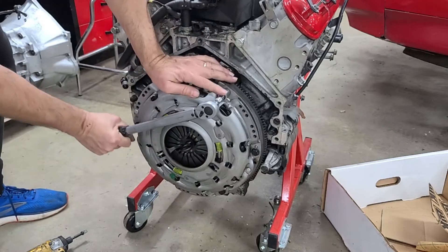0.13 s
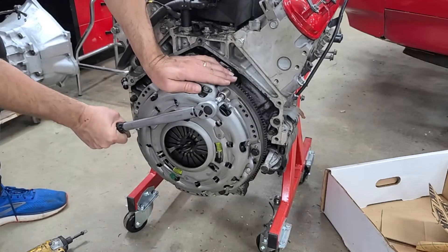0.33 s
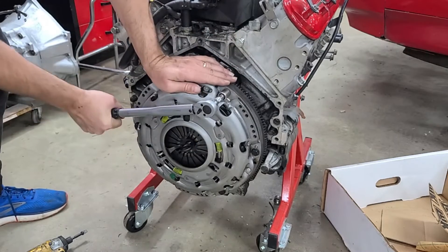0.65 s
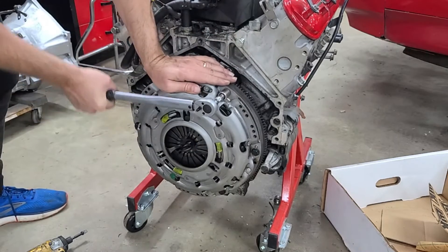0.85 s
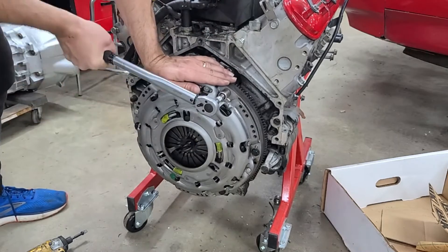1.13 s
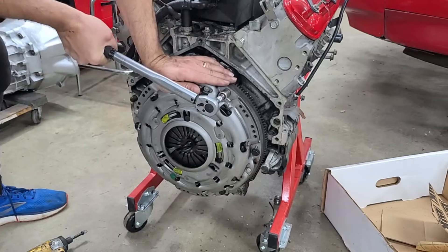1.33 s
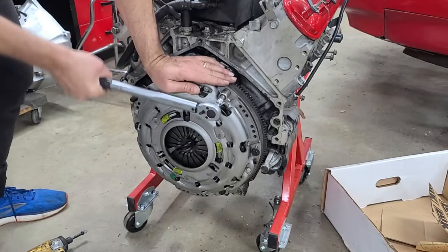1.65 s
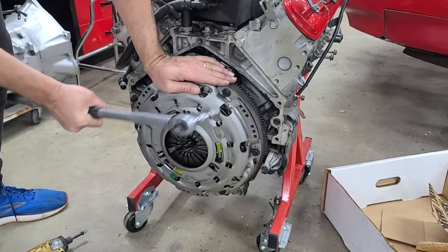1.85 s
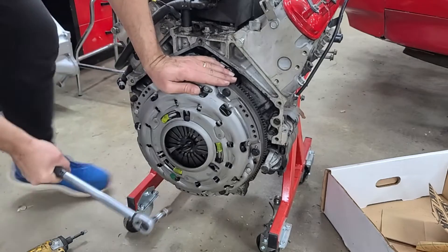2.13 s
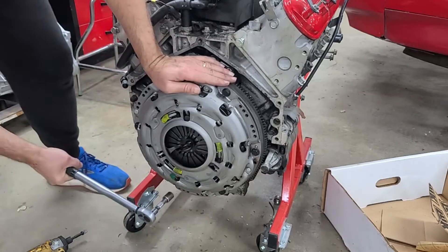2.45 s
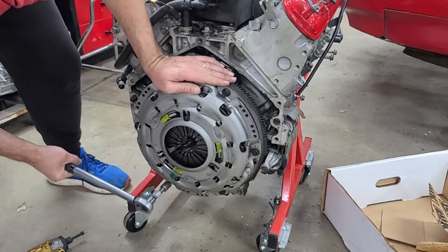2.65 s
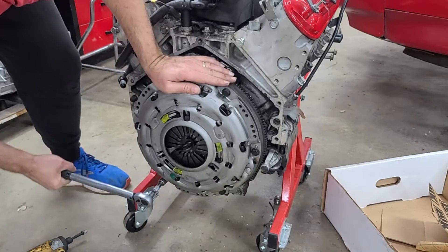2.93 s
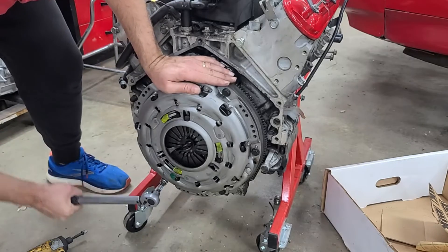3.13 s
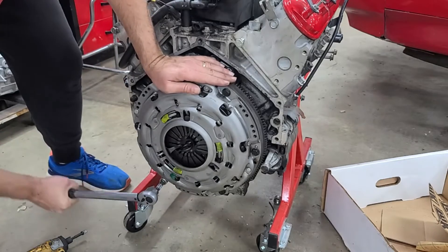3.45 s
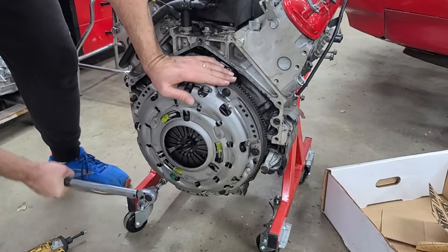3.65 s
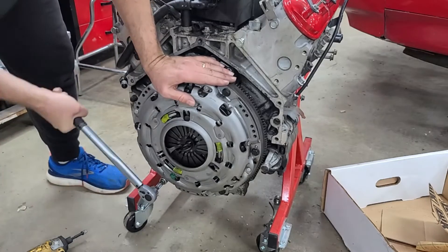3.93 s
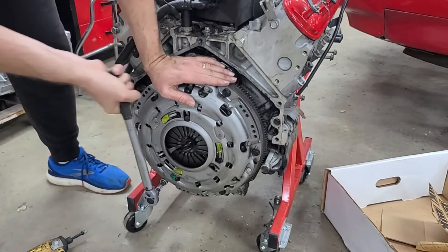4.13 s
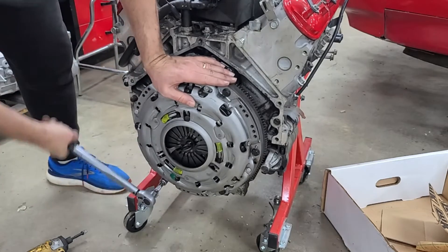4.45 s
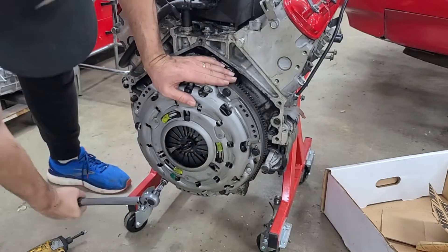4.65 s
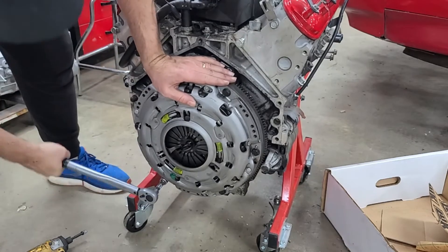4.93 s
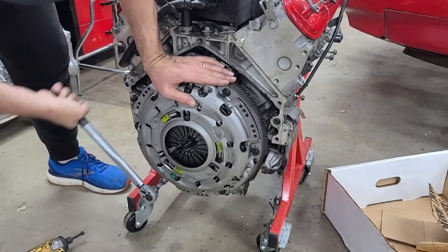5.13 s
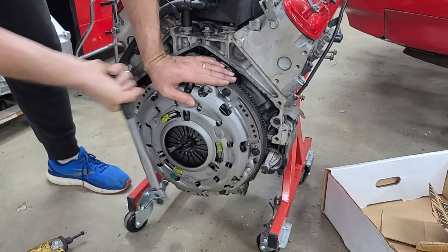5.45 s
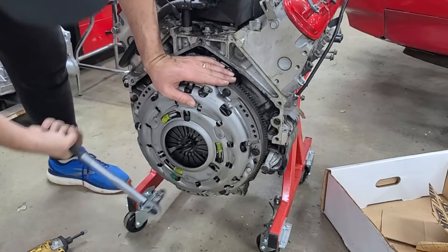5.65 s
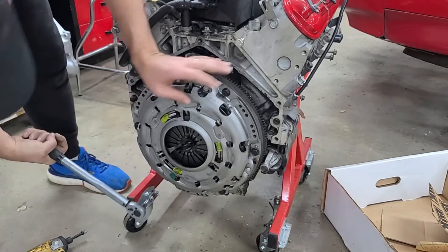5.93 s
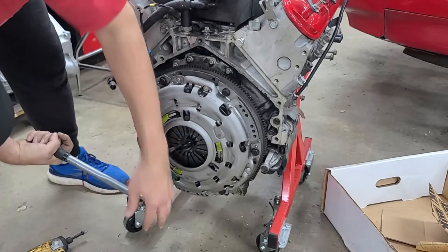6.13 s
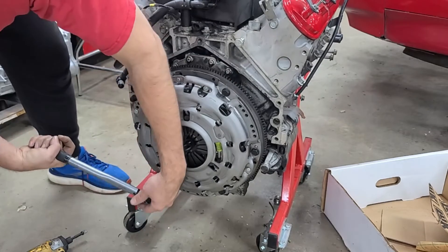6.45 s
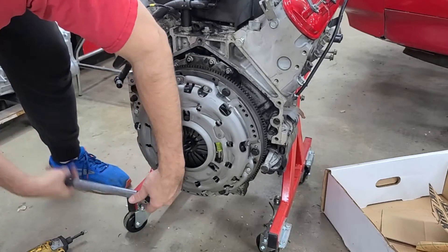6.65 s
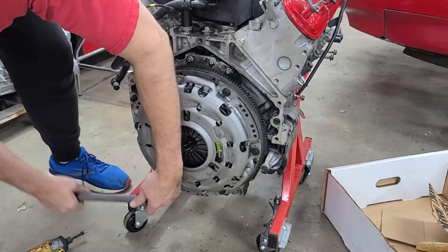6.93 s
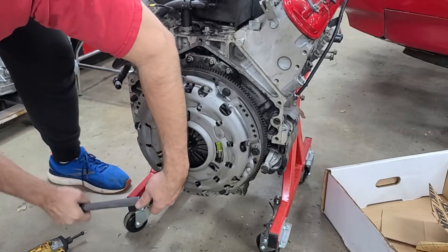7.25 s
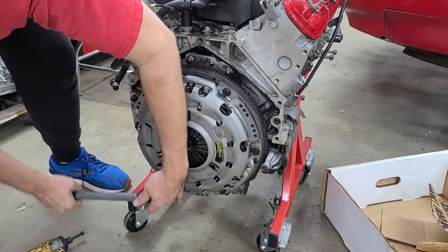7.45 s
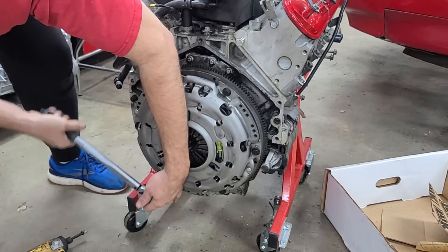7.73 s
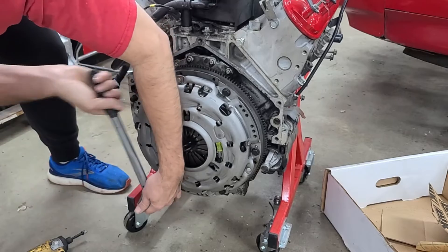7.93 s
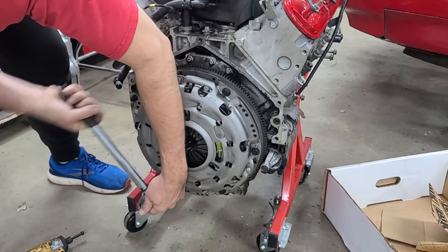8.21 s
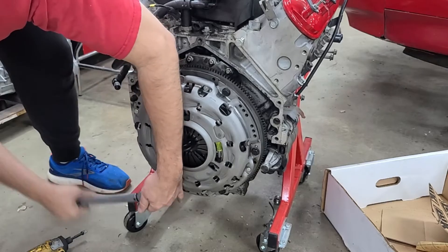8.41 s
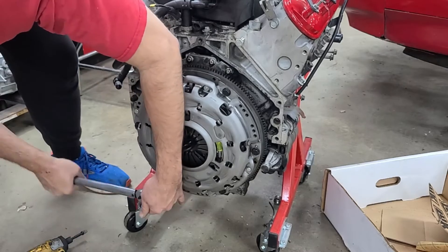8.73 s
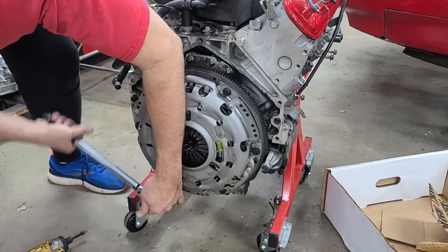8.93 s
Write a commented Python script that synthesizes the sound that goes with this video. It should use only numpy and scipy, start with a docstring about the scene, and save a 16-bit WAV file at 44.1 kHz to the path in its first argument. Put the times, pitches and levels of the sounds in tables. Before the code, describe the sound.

A torque wrench clicks over loudly on an engine bolt, and the socket comes off with clunks and short scrapes. Loose steel then knocks and clinks on a metal caster in scattered clusters, loudest past the middle, alternating with three brief bursts of bright ratchet ticks. Soft handling rustle fills some gaps. Everything is heard nearby, a little to the left, over a faint steady hum in a mildly reverberant garage.

```python
"""A garage. A mechanic torques a clutch bolt on an engine: the wrench's toggle snaps over and rattles,
then the socket clunks and scrapes off the bolt. At a caster of the steel engine stand the socket knocks
and the ratchet pawl ticks on the back strokes. Each blow is a noise crack plus ringing steel modes;
the heaviest also jolt the engine. Hands rub on the tool; a motor hums faintly over the room air."""
import sys
import numpy as np
from scipy import signal
from scipy.fft import rfft, irfft
from scipy.io import wavfile

SR = 44100
rng = np.random.default_rng(int(sys.argv[2]) if len(sys.argv) > 2 else 0)


def pcm_store(signal):
    """Save signal as 16-bit PCM."""
    levels = np.round(np.clip(np.atleast_2d(signal), -1, 1) * 32767)
    wavfile.write(sys.argv[1], SR, levels.astype(np.int16).T)


N = 400428

# Motor partials. Each row: frequency in Hz, amplitude in dB, waver in dB.
MOTOR_PARTIALS = [(119.1, -53, 2), (188.2, -54.5, 2), (357.6, -66.5, 3), (673, -69, 1.5)]
# Room air. Each row: frequency in Hz, relative density in dB.
AIR_SPECTRUM = [(22, -16.5), (62, -3.5), (80, 1.5), (103, -8.5), (160, -0.5), (250, -6.5), (330, -7),
                (500, -9.5), (680, -13), (1000, -17), (2800, -21), (4200, -33.5), (6500, -36),
                (9000, -48.5), (16000, -44)]
# Diffuse room sound. Each row: frequency in Hz, left-right correlation.
ROOM_CORRELATION = [(60, 0.98), (150, .92), (300, 0.77), (700, 0.078), (2000, 0.11), (10000, 0.059)]
# Grip shifts and tool swings. Each row: middle in seconds, length in seconds, level in dB.
GRIPS = [(0.506, 0.35, -68), (1.666, 0.15, -43.5), (2.29, 0.32, -52.5), (3.197, 0.25, -65.5),
         (3.878, 0.055, -53.5), (4.09, 0.16, -58), (5.198, 0.11, -65.5), (6.008, 0.097, -51.5),
         (6.989, 0.33, -64), (7.819, 0.18, -75)]

# Blows: socket on caster, toggle in wrench, socket on clutch bolt. Each row: start in seconds,
# mid-band level in dB, bass thud and treble edge in dB re mid, ring in dB re crack, clink in Hz.
CASTER_KNOCKS = [(0.1113, -53, 8, -20, -10.5, 3910), (2.7009, -41.5, -7, -46, -8.5, 3830),
                 (2.7507, -21, -7.5, -13, -15.5, 2960), (2.8858, -38, -3, 2.5, -14, 5000),
                 (2.8885, -23, -7.5, 0.5, -13.5, 7600), (3.0625, -37.5, -4, -12, -9, 6700),
                 (3.2468, -56.5, 12, -34, -13, 1940), (3.3286, -38, 1, -12.5, -9.5, 3170),
                 (3.4073, -44, -9, -20, -23, 4730), (3.884, -57, -14, 1, -16, 5500),
                 (4.238, -58, 9, -28, -3, 2600), (4.7013, -49.5, 9, -18, -2, 3550),
                 (5.437, -47.5, -10.5, -17.5, 1, 4110), (5.4549, -21.5, -22, -17.5, 6, 3900),
                 (5.4749, -29, -17, -16.5, -14, 4050), (5.507, -32.5, -3, -21.5, -8, 4160),
                 (5.5407, -16, -5, -23.5, -4.5, 5850), (5.589, -36, 5.5, -7, -5, 3000),
                 (5.6052, -20.5, -3, -5.5, -6, 5470), (5.6085, -22, -0.5, -0.5, -8.5, 5270),
                 (6.2107, -28, 0.5, -18.5, -5.5, 2830), (6.235, -22, -27, -18, -9, 4100),
                 (6.3032, -25.5, -8.5, -9.5, -12, 3340), (6.314, -35, -21, -6, -2, 3540),
                 (6.4093, -31, -11, -6, 0, 6700), (6.4323, -25, 1.5, -4.5, -6.5, 3180),
                 (6.444, -37, 7.5, -4, -7, 2570), (6.924, -55, 10, -14, -4, 3270),
                 (7.0495, -54, 0.5, -16, -10.5, 3000), (7.2388, -50.5, -1, -24, -10, 2900),
                 (7.266, -49, -0.5, -31, -14, 2930), (7.409, -52.5, 3.5, -45, -11, 3430),
                 (8.1302, -38, 4.5, -13.5, -11, 3880), (8.7054, -49, 3.5, -21, -16, 2950),
                 (9.0424, -48.5, -9.5, -29.5, -13.5, 3340)]
WRENCH_SNAPS = [(0.6462, -31, -14.5, -7, -10.5, 4400), (0.6507, -20, -18, -12, -12.5, 3000),
                (0.6527, -17.5, -22.5, -11, -13.5, 6600), (0.6765, -36.5, -8.5, -12.5, -5.5, 3003),
                (0.6825, -36.5, -13.5, -17, -10.5, 2900)]
BOLT_CLUNKS = [(1.5648, -17.5, -14, -8, -14, 4220), (1.7524, -29, -17, -18, -23, 4600),
               (1.864, -28.5, -13.5, -16, -25, 3020)]
# Knock position, nearer the middle as the socket slips off the caster.
# Each row: time in seconds, left over right in dB.
KNOCK_PAN = [(5.5, 4.5), (5.54, 2), (5.61, 3.5), (6.2, 5)]
# Uneven shading by the engine: left over right in dB for bass, mid and treble.
ENGINE_SHADING_DB = [-5, -1, -6]
# Jolts of the engine. Each row: start in seconds, level in dB.
JOLTS = [(0.654, -42.5), (1.567, -45.5), (1.862, -47), (5.543, -53), (5.608, -34)]
# Pulls on the socket. Each row: start in seconds, length in seconds, level swelled to in dB.
PULLS = [(1.703, 0.021, -39), (1.827, 0.029, -24.5), (1.913, 0.058, -53), (1.97, 0.11, -44),
         (2.17, 0.031, -30.5), (2.264, 0.024, -48), (2.404, 0.019, -46.5)]
# Teeth passing the pawl. Each row: time in seconds, mid-band level in dB,
# bass thud and treble edge in dB re mid, clink in Hz.
TEETH = [(4.3664, -36, -8.5, 0.5, 6380), (4.4403, -34.5, -7.5, 4.5, 3070), (4.4935, -30.5, -17, -1.5, 2840),
         (4.5399, -35, -7.5, 2.5, 6200), (4.5922, -38.5, -5, 5, 6600), (6.6629, -38, -7.5, 2.5, 5560),
         (6.7192, -35, -11, 0.5, 3140), (6.778, -34, -15.5, 0, 4900), (8.258, -34.5, -15, 3, 4300),
         (8.302, -33, -8, 2.5, 3120), (8.3413, -35, -11, 1.5, 5560), (8.3772, -33, -9, -5.5, 3320),
         (8.416, -32.5, -13.5, -4.5, 6560), (8.4665, -36, -12, 3.5, 2780)]

# Modes of the steel parts. Each row: frequency in Hz, relative level in dB.
STAND_MODES = [(1208, 0), (1248, 5.5), (1282, -4.5), (1421, -3.5), (1540, -6), (1695, -4), (2046, -7),
               (2190, -9), (2610, -2.5), (2765, 1), (2920, -4.5), (3045, 1.5), (3182, -1.5), (3370, -2),
               (3578, -5), (4128, 5), (4228, -0.5), (4610, -6), (5251, -1), (6490, 6)]
WRENCH_MODES = [(1240, -3), (1421, -5), (1561, -15), (2240, -8), (2358, -4), (2885, 2.5), (3035, 4.5),
                (3391, 2.5), (5152, -6.5), (5992, -2.5), (6300, -2.5), (6573, -3)]
CLUTCH_MODES = [(1275, -3.5), (1560, -17.5), (2546, -9), (2993, 10), (3340, -2.5), (4296, -4.5), (4592, -5),
                (7397, 5.5)]
SOCKET_MODES = [(565, 7), (940, -4.5), (1700, -6), (3150, 0), (4800, -1), (6800, -2.5)]
PAWL_MODES = [(1200, 5.5), (1255, 6), (2720, -6), (3050, -13), (3410, -21), (4130, 6), (6450, 0.5),
              (6740, 2)]

# Spectra of rubs, cracks, thumps and reverb. Each row: frequency in Hz, relative density in dB.
RUSTLE_SPECTRUM = [(300, -4), (1250, 2.5), (2100, 3.5), (3000, 7.5), (4200, 1.5), (6500, -2), (9000, -16),
                   (15000, -7.5)]
KNOCK_SPECTRUM = [(120, -17.5), (400, -21), (700, -7.5), (1020, -11.5), (1250, 2.5), (1480, -9), (1900, -5),
                  (2900, 6), (4300, 4.5), (6600, -1), (8300, -11.5), (11000, -5.5), (16000, -15)]
SNAP_SPECTRUM = [(120, -37.5), (450, -11), (800, -9.5), (1250, -4.5), (1800, -16), (3100, -2), (4500, -4),
                 (5500, -7.5), (7300, -1.5), (8800, -9.5), (11500, 5), (16000, -2.5)]
JOLT_SPECTRUM = [(80, -32.5), (170, 10), (250, -10.5), (340, -1.5), (460, -4), (700, -18.5), (3000, -49)]
SCRAPE_SPECTRUM = [(150, -1.5), (400, -4.5), (750, -5), (2000, 4), (3000, 3), (5000, 2), (7300, -0.5),
                   (9000, -8), (16000, -5.5)]
TOOTH_SPECTRUM = [(120, -34), (500, -14), (950, -7.5), (1230, -5), (1600, -7), (2200, -7.5), (3000, 4.5),
                  (4000, 1), (6500, -2.5), (8500, -11), (12000, -10), (16000, -14)]
GARAGE_SPECTRUM = [(150, -1), (1200, 4), (3000, 5), (7000, -1), (10000, 0), (16000, 0)]
# Reverb decay. Each row: frequency in Hz, T60 in seconds.
GARAGE_T60 = [(200, 0.12), (1200, 0.59), (3000, 0.42), (6500, 0.39), (10000, 0.25), (16000, 0.28)]

RING_TIME_S = np.arange(SR // 2) / SR
LEFT_RIGHT = np.array([[1], [-1]])
EDGES_HZ = np.geomspace(22, 18000, 30)
BANDS = [(np.sqrt(lo * hi), signal.butter(2, [lo, hi], "band", fs=SR, output="sos"))
         for lo, hi in zip(EDGES_HZ, EDGES_HZ[1:])]
REGISTERS = [signal.butter(4, band_hz, "band", fs=SR, output="sos")
             for band_hz in [(130, 1900), (1900, 7500), (7500, 17000)]]


def from_db(db):
    """Decibels to gain."""
    return 10 ** (np.asarray(db) / 20)


def unit_rms(x):
    """Scale to unit power."""
    return x / np.sqrt(np.mean(x ** 2) + 1e-20)


def at_hz(table, hz):
    """Read a table on a log-frequency axis."""
    freqs_hz, values = np.transpose(table)
    return np.interp(np.log(hz), np.log(freqs_hz), values)


def resonate(x, hz, q):
    """One resonance, unity gain at its peak."""
    return signal.lfilter(*signal.iirpeak(hz, q, fs=SR), x)


def drift(rate_hz):
    """Slow random wander of unit RMS."""
    hop, warmup = 100, 1000
    pole = np.exp(-2 * np.pi * rate_hz * hop / SR)
    noise = rng.standard_normal(N // hop + warmup + 2)
    slow = signal.lfilter([1], [1, -2 * pole, pole * pole], noise)[warmup:]
    return np.interp(np.arange(N) / hop, np.arange(len(slow)), unit_rms(slow))


def coloured(x, spectrum, size=4096):
    """Shape x with a minimum-phase filter."""
    bins_hz = np.arange(size // 2 + 1) * SR / size + 1
    cepstrum = irfft(np.log(from_db(at_hz(spectrum, bins_hz))))
    cepstrum[1:size // 2] *= 2
    cepstrum[size // 2 + 1:] = 0
    impulse = irfft(np.exp(rfft(cepstrum)))
    return signal.fftconvolve(x, impulse[None], axes=-1)[:, :x.shape[-1]]


def stereo(pair, correlation):
    """Mix two independent signals to left and right as mid and side."""
    return np.sqrt((1 + correlation) / 2) * pair[0] + np.sqrt((1 - correlation) / 2) * pair[1] * LEFT_RIGHT


def diffuse_bands(samples):
    """Yield centre frequency and stereo noise for each band of the room."""
    white = rng.standard_normal((2, 2, samples))
    for k, (hz, sos) in enumerate(BANDS):
        yield hz, signal.sosfilt(sos, stereo(white[k % 2], at_hz(ROOM_CORRELATION, hz)))


def friction(grains_per_s, spread_db):
    """Surfaces catch and slip in a dense rain of tiny contacts."""
    sizes = rng.standard_normal((2, N)) * from_db(spread_db * np.minimum(rng.exponential(1, (2, N)), 4))
    caught = rng.random((2, N)) < grains_per_s / SR
    return stereo(sizes * caught, correlation=0.12)


def contact_force(chatter_s, bounce_db, bounces=9):
    """One firm contact, then fading bounces as loose parts settle."""
    force = np.zeros(SR // 10)
    lateness = rng.exponential(1, bounces)
    onsets = np.minimum(lateness * chatter_s * SR, len(force) - 1).astype(int)
    force[onsets] = rng.normal(0, 1, bounces) * from_db(bounce_db) * np.exp(-lateness / 2)
    force[0] = 1
    return force


def steel_crack(spectrum, t60_s, strike_db, strike_s):
    """A hard strike, then crowded, quickly damped modes as a noise burst."""
    t = RING_TIME_S
    mid, side = rng.standard_normal((2, len(t)))
    highpass = signal.butter(1, 1100, "high", fs=SR, output="sos")
    side = signal.sosfilt(highpass, side)   # long waves reach both sides alike
    decay = from_db(-60 * t / t60_s) * (1 - np.exp(-t / 0.0007))
    strike = from_db(strike_db) * np.exp(-t / strike_s)
    return unit_rms(coloured(stereo([mid, side], correlation=0.04) * (decay + strike), spectrum))


def steel_ring(modes, detune, t60_1khz_s):
    """Long modes; loose joints split each into four beating partials."""
    t = RING_TIME_S
    hz, level_db = np.repeat(np.transpose(modes), 4, axis=1)
    hz = hz * (1 + detune * np.sqrt(hz / 2200) * rng.standard_normal(len(hz)))
    t60_s = t60_1khz_s * (hz / 1000) ** -0.45
    gains = from_db(level_db + 2 * rng.standard_normal(len(hz)))
    phasors = gains * np.exp(2j * np.pi * rng.random(len(hz)))
    poles = (2j * np.pi * hz - np.log(1000) / t60_s) / SR
    block = 150   # damped sines summed blockwise for speed
    block_starts = phasors * np.exp(np.outer(np.arange(0, len(t), block), poles))
    ring = (block_starts @ np.exp(np.outer(poles, np.arange(block)))).real.ravel()[:len(t)]
    return unit_rms(ring * (1 - np.exp(-t / 0.003)))   # takes a few ms to spread through the metal


def blows(table, crack, ring, chatter_s, bounce_db, clink_db, clink_q, pan):
    """Steel on steel; spot and hardness of each contact set its clink, thud, edge and ring."""
    out = np.zeros((2, N + SR))
    window_s = 0.02   # level = energy gathered into this time
    for start_s, level_db, thud_db, edge_db, ring_db, clink_hz in table:
        response = steel_crack(**crack) + from_db(ring_db) * steel_ring(**ring)
        hit = signal.fftconvolve(response, contact_force(chatter_s, bounce_db)[None], axes=-1)
        hit += from_db(clink_db) * resonate(hit, clink_hz, clink_q)
        start = round(start_s * SR)
        pan_db = np.interp(start_s, *np.transpose(pan))
        for sos, register_db, shade_db in zip(REGISTERS, (thud_db, 0, edge_db), ENGINE_SHADING_DB):
            part = signal.sosfilt(sos, hit)
            part /= np.sqrt(np.sum(part ** 2, axis=1, keepdims=True) / (window_s * SR))
            gain = from_db(level_db + register_db + (pan_db + shade_db) * LEFT_RIGHT / 2)
            out[:, start:start + part.shape[1]] += gain * part
    return out[:, :N]


def motor_hum():
    """A motor's partials, wavering in level and phase."""
    t = np.arange(N) / SR
    return sum(from_db(db + waver_db * drift(5.5)) * np.sin(2 * np.pi * hz * t + waver_db / 2 * drift(3.4))
               for hz, db, waver_db in MOTOR_PARTIALS)


def room_air():
    """Soft, steady rush of air."""
    air = sum(noise * from_db(at_hz(AIR_SPECTRUM, hz)) for hz, noise in diffuse_bands(N))
    return from_db(-54.5) * unit_rms(air)


def handling(holding_db=-68.5):
    """Skin and cloth rub on the tool; its head drags on the caster and wakes the stand's modes."""
    t = np.arange(N) / SR
    rub = unit_rms(coloured(friction(grains_per_s=8000, spread_db=-1), RUSTLE_SPECTRUM))
    catches = friction(grains_per_s=270, spread_db=2.5)
    drag = unit_rms(sum(from_db(db) * (1000 / hz) * resonate(catches, hz, q=35) for hz, db in STAND_MODES))
    rub *= from_db(-1 + 2.5 * drift(9))
    drag *= from_db(-7.5 + 3.2 * drift(14))
    grips = sum(from_db(db) * np.exp(-2 * ((t - middle_s) / length_s) ** 2)
                for middle_s, length_s, db in GRIPS)
    return (rub + drag) * (from_db(holding_db) + grips)


def socket_knocks():
    """The loose socket knocks on the caster and rings the stand's tubes."""
    crack = dict(spectrum=KNOCK_SPECTRUM, t60_s=0.046, strike_db=1.5, strike_s=0.0006)
    ring = dict(modes=STAND_MODES, detune=0.0065, t60_1khz_s=0.24)
    return blows(CASTER_KNOCKS, crack, ring, chatter_s=0.0043, bounce_db=-16,
                 clink_db=1.5, clink_q=5, pan=KNOCK_PAN)


def torque_release():
    """The sprung toggle slaps the wrench's tube and rattles; the socket then clunks on the bolt."""
    crack = dict(spectrum=SNAP_SPECTRUM, t60_s=0.098, strike_db=7.5, strike_s=0.002)
    out = np.zeros((2, N))
    for table, modes in (WRENCH_SNAPS, WRENCH_MODES), (BOLT_CLUNKS, CLUTCH_MODES):
        ring = dict(modes=modes, detune=0.008, t60_1khz_s=0.25)
        out += blows(table, crack, ring, chatter_s=0.0096, bounce_db=-22.5,
                     clink_db=-1.5, clink_q=6, pan=[(0, 3.5)])
    return out


def engine_jolts(t60_s=0.15, rise_s=0.0012):
    """The heaviest blows jolt the engine on its stand: a dull, damped thump."""
    thump = from_db(-60 * RING_TIME_S / t60_s) * (1 - np.exp(-RING_TIME_S / rise_s))
    envelope = np.zeros(N + SR)
    for start_s, level_db in JOLTS:
        start = round(start_s * SR)
        envelope[start:start + len(thump)] += from_db(level_db) * thump
    noise = stereo(rng.standard_normal((2, N)), correlation=0.88)
    return envelope[:N] * unit_rms(coloured(noise, JOLT_SPECTRUM))


def socket_scrape(attack_s=0.0044, release_s=0.032, swell_db=12.5):
    """Each pull swells until the socket slips; the shifting contact wakes its modes in turn."""
    scrape = coloured(friction(grains_per_s=8000, spread_db=2.1), SCRAPE_SPECTRUM)
    ring = sum(from_db(db + 4.5 * drift(8)) * resonate(scrape, hz, q=13) for hz, db in SOCKET_MODES)
    envelope = np.zeros(N)
    for start_s, length_s, level_db in PULLS:
        t = np.maximum(np.arange(N) / SR - start_s, 0)
        swell = from_db(level_db - swell_db * np.maximum(1 - t / length_s, 0))
        release = np.exp(-np.maximum(t - length_s, 0) / release_s)
        envelope += swell * (1 - np.exp(-t / attack_s)) * release
    catching_db = 1.6 * drift(70)
    return unit_rms(scrape + ring) * envelope * from_db(catching_db + 1.6 * LEFT_RIGHT)


def ratchet(offset_s=0.001, touch_db=-13, ring_db=-12.5):
    """The pawl touches each tooth's crest faintly, then drops with a bright tick."""
    ticks = [(time_s + shift_s, level_db + trim_db, thud_db, edge_db, ring_db, clink_hz)
             for time_s, level_db, thud_db, edge_db, clink_hz in TEETH
             for shift_s, trim_db in ((-offset_s, touch_db), (offset_s, 0))]
    crack = dict(spectrum=TOOTH_SPECTRUM, t60_s=0.062, strike_db=2.5, strike_s=0.0014)
    ring = dict(modes=PAWL_MODES, detune=0.0088, t60_1khz_s=0.17)
    return blows(ticks, crack, ring, chatter_s=0.005, bounce_db=-12.5,
                 clink_db=3, clink_q=21, pan=[(0, 4.2)])


def garage_reverb(x):
    """Diffuse tail, longest in the midrange."""
    t = np.arange(SR) / SR
    tail = sum(noise * from_db(at_hz(GARAGE_SPECTRUM, hz) - 60 * t / at_hz(GARAGE_T60, hz))
               for hz, noise in diffuse_bands(SR))
    onset = 1 - np.exp(-(t / 0.00028) ** 2)
    impulse = unit_rms(tail * onset) / np.sqrt(SR)
    return signal.fftconvolve(x, impulse, axes=-1)[:, :N]


def scene():
    """Tool work slightly to the left, faint reverb, hum and air."""
    work = handling() + socket_knocks() + torque_release() + engine_jolts() + socket_scrape()
    ticks = ratchet()
    left, right = work + ticks
    direct = np.stack([left, np.pad(right[:-2], (2, 0))])   # right arrives two samples later
    reverb = garage_reverb(from_db(-10) * work + from_db(-6.5) * ticks)
    return direct + reverb + motor_hum() + room_air()


def record(dry, ceiling=0.95, cutoff_hz=16600):
    """Soft clip, then a steep low-pass."""
    lowpass = signal.ellip(10, 0.1, 80, cutoff_hz, fs=SR, output="sos")
    return signal.sosfilt(lowpass, ceiling * np.tanh(dry / ceiling))


dry = scene()
out = record(dry)
pcm_store(out)
```